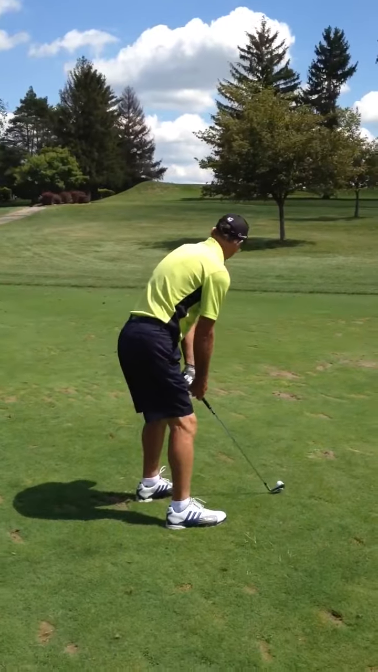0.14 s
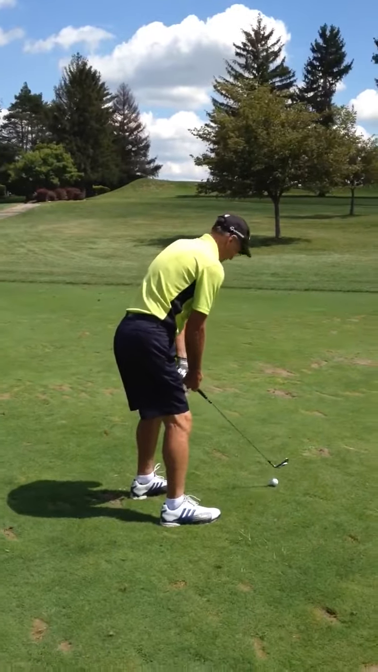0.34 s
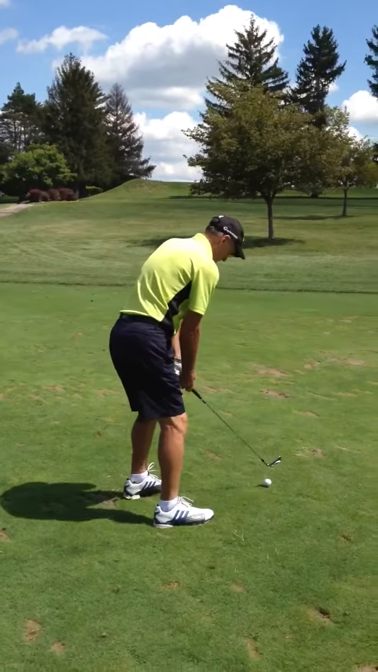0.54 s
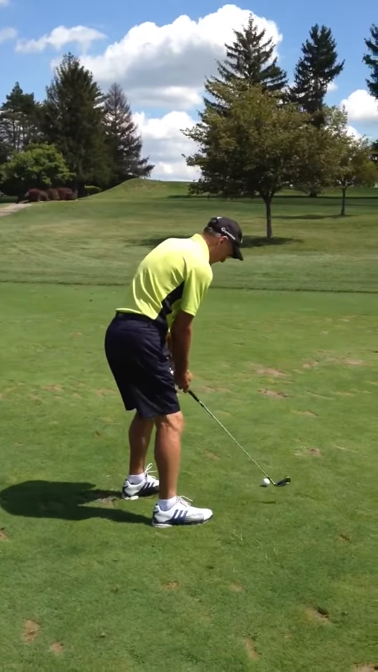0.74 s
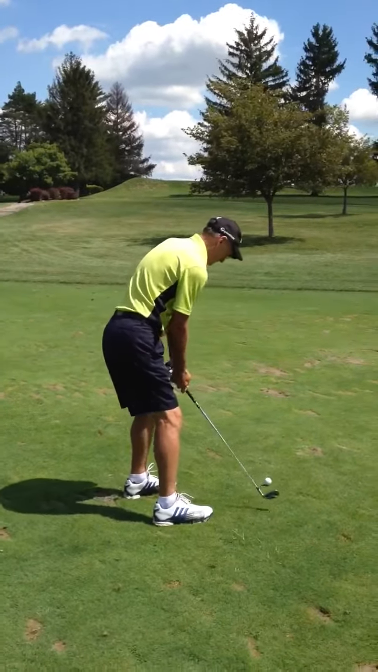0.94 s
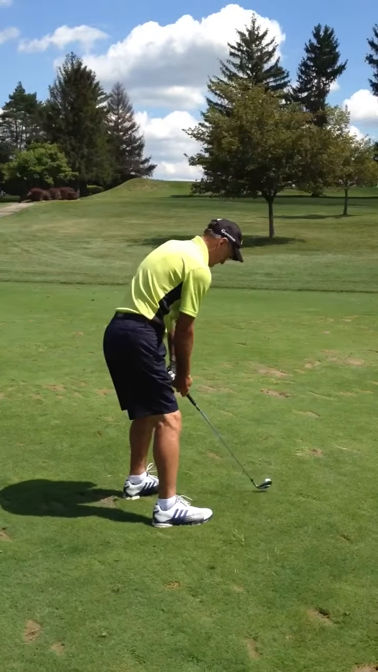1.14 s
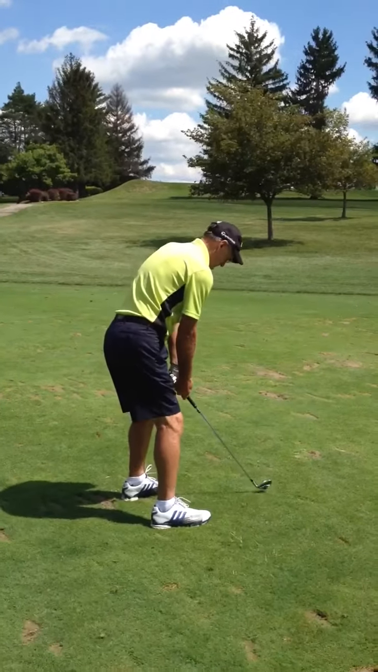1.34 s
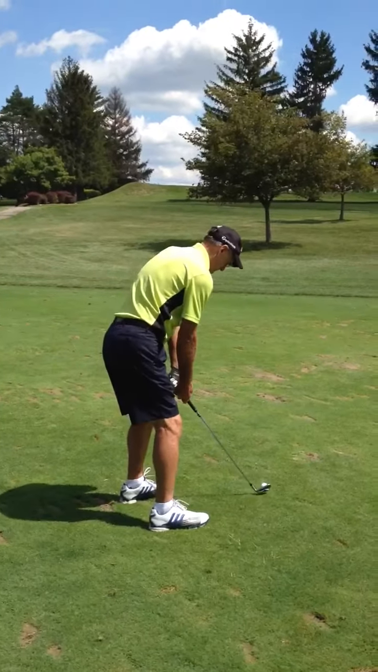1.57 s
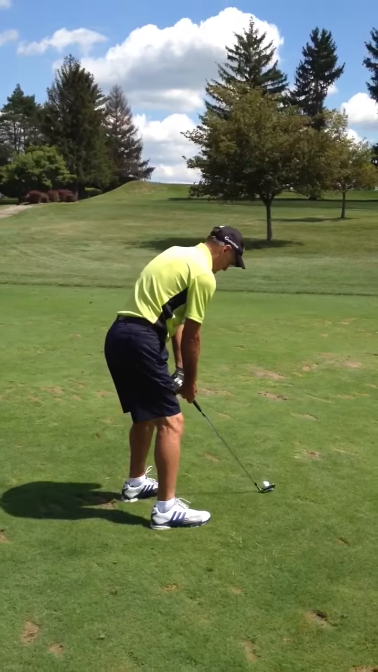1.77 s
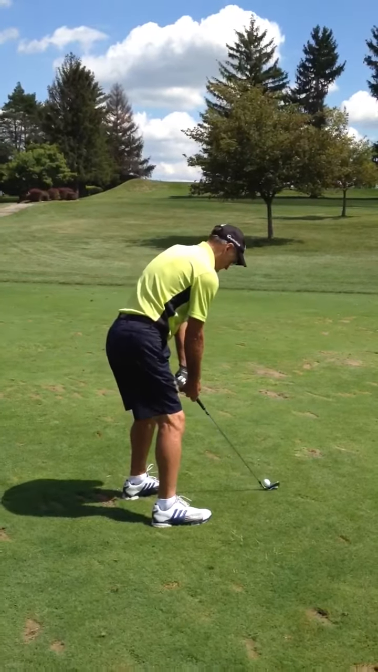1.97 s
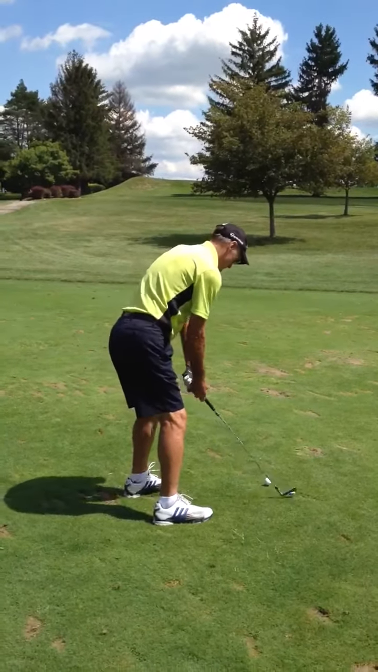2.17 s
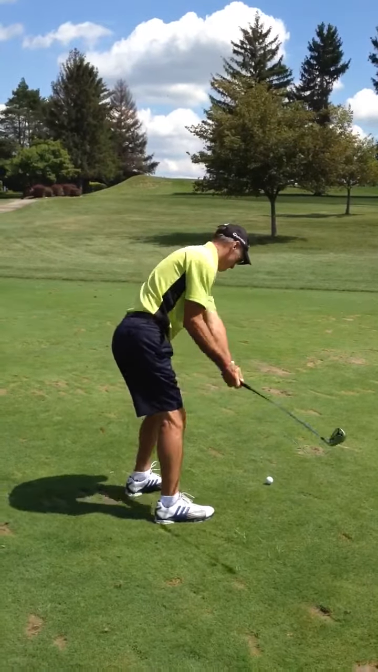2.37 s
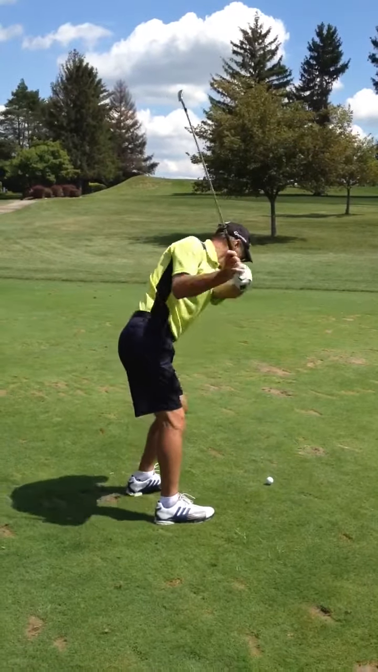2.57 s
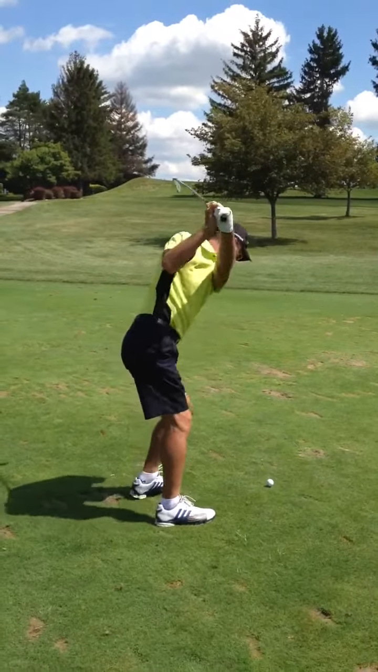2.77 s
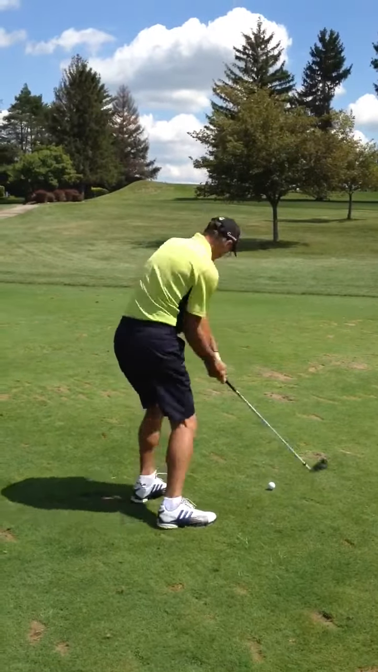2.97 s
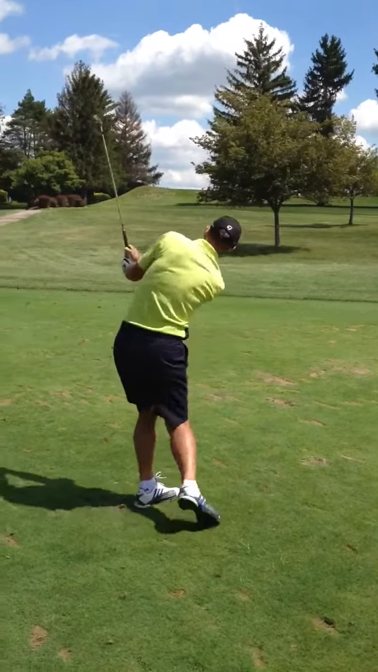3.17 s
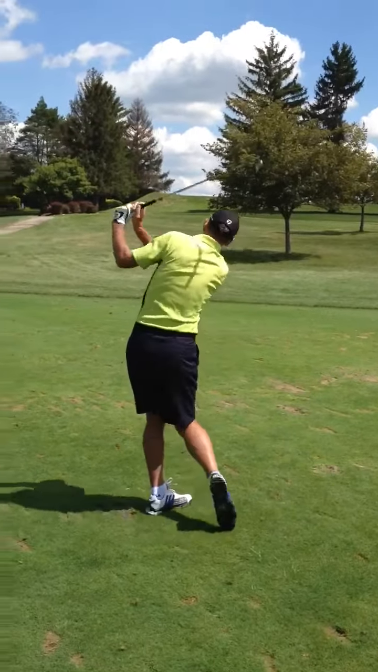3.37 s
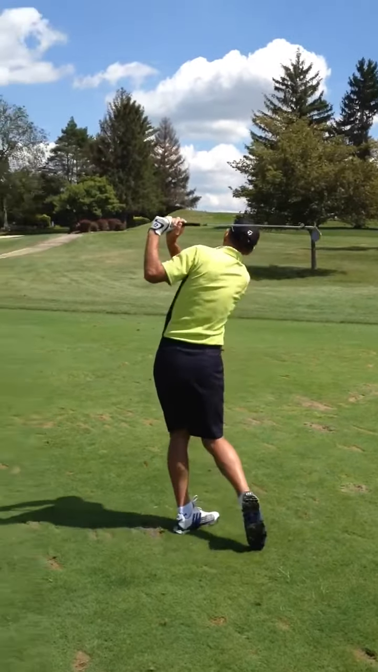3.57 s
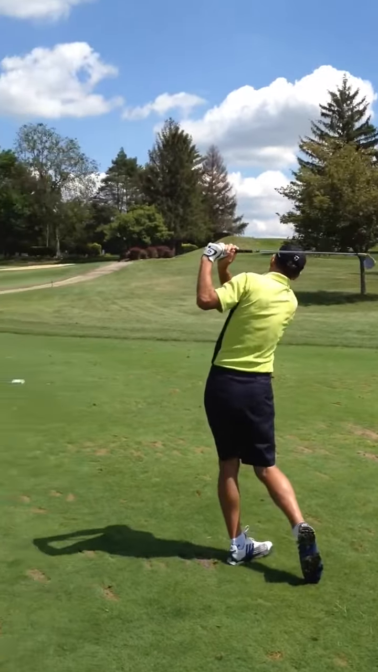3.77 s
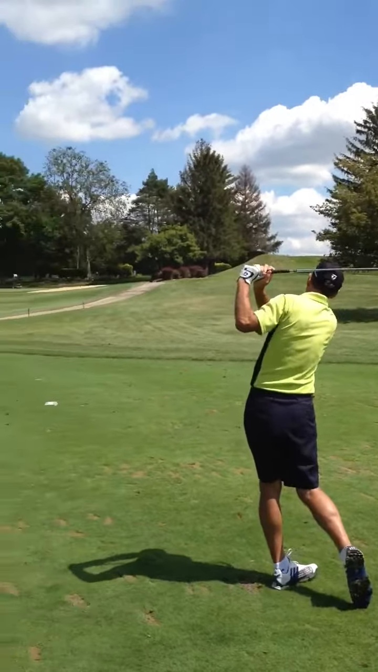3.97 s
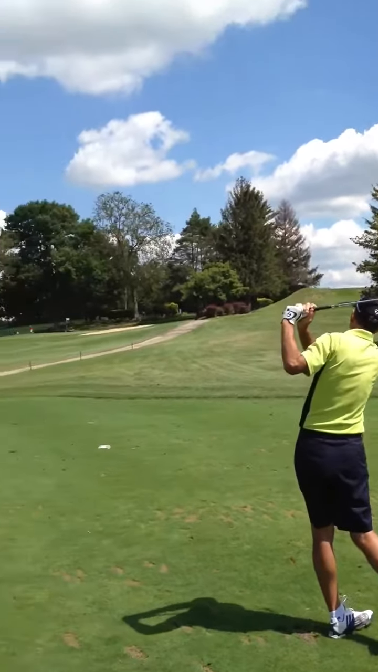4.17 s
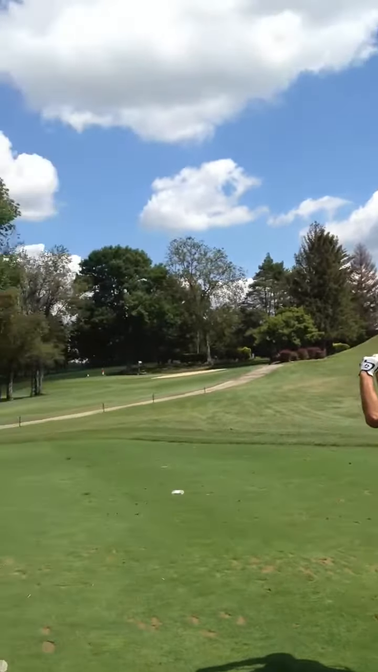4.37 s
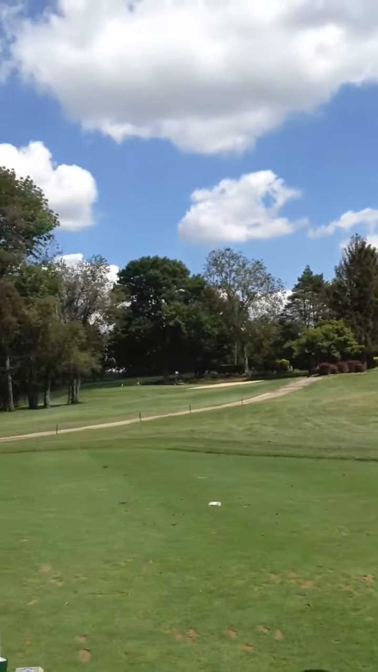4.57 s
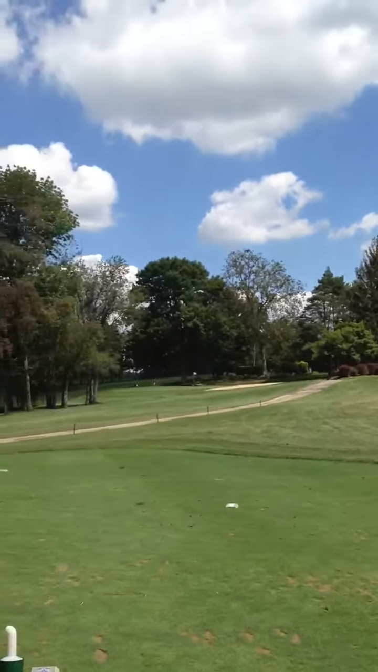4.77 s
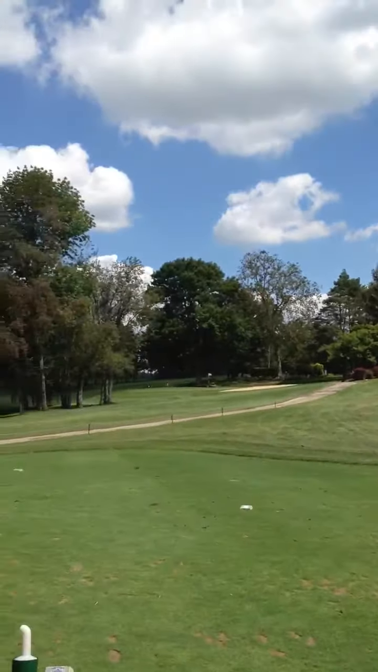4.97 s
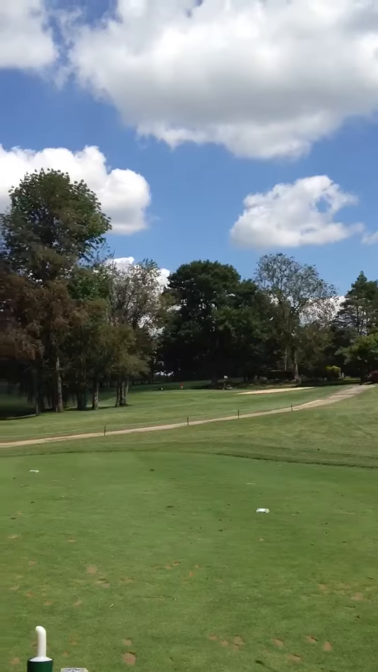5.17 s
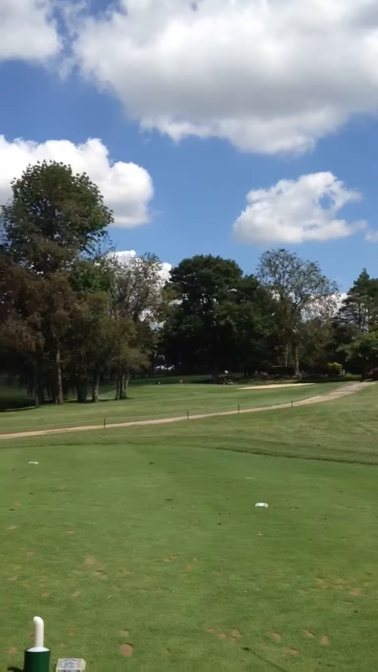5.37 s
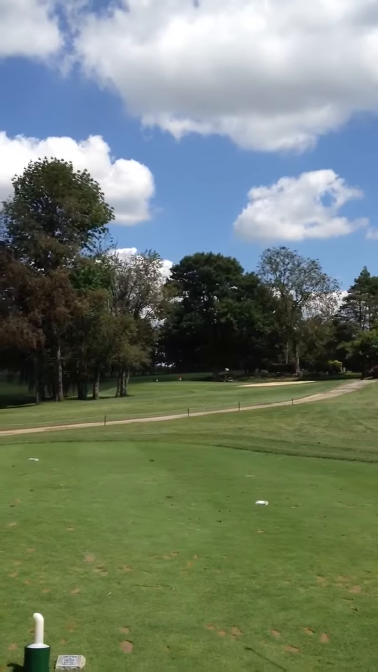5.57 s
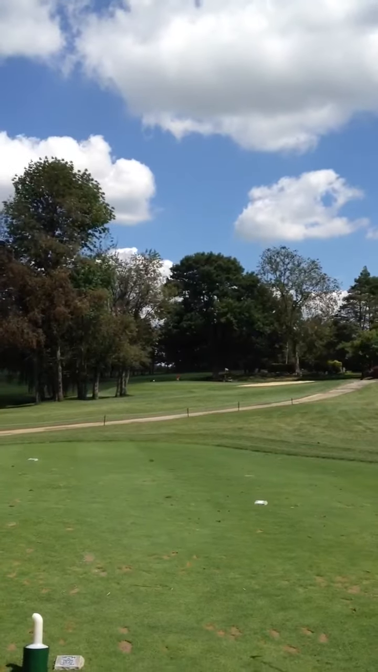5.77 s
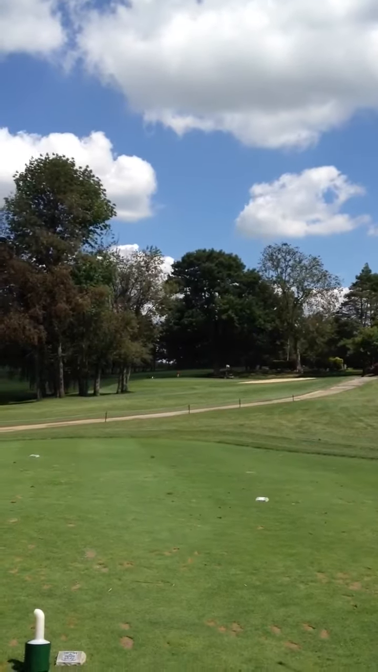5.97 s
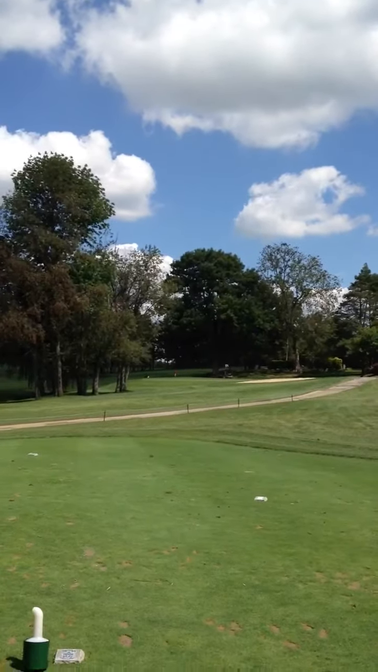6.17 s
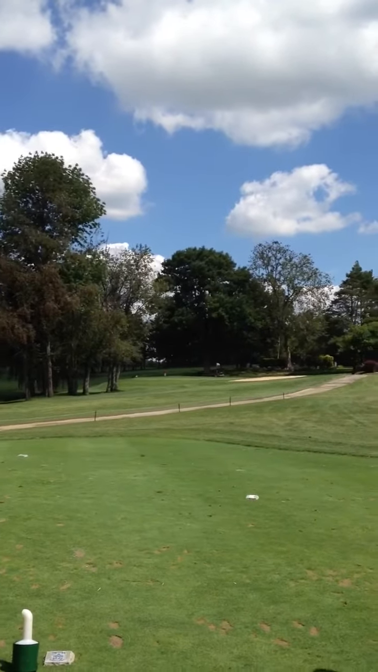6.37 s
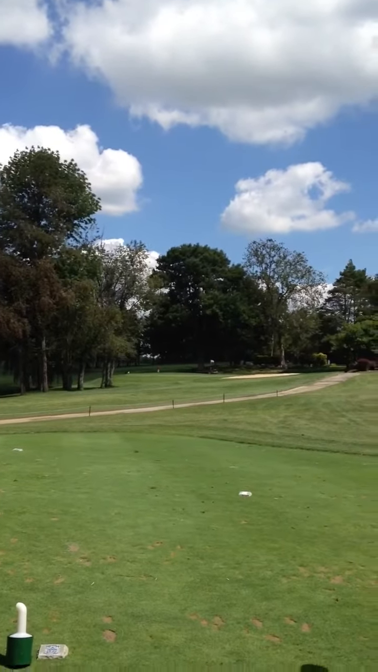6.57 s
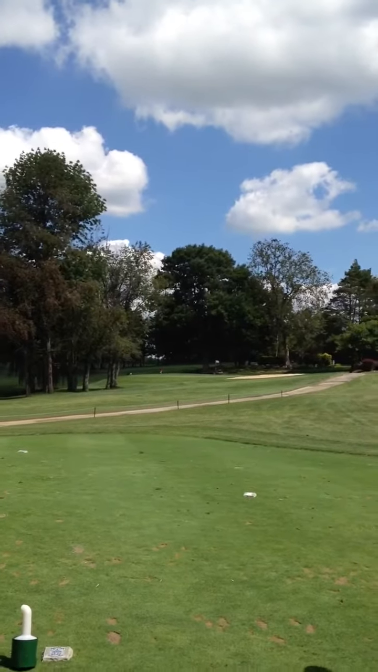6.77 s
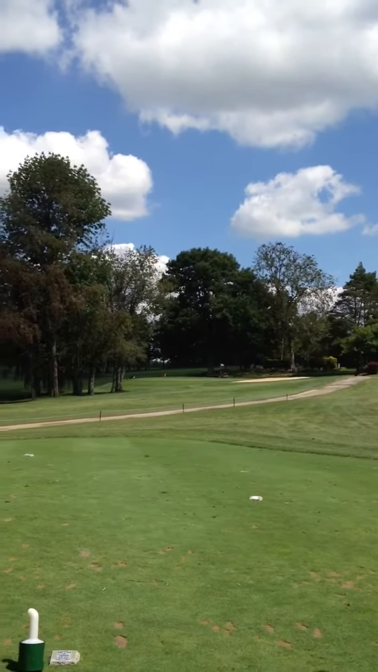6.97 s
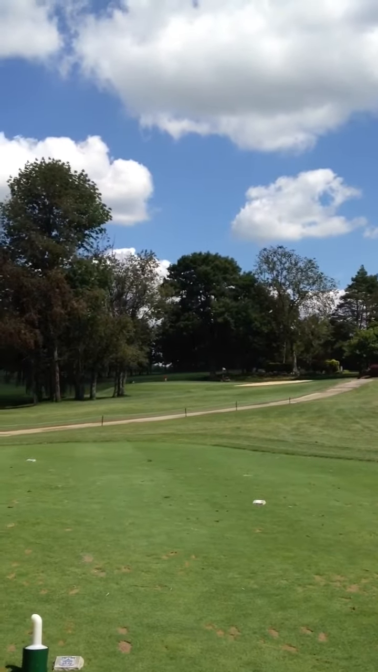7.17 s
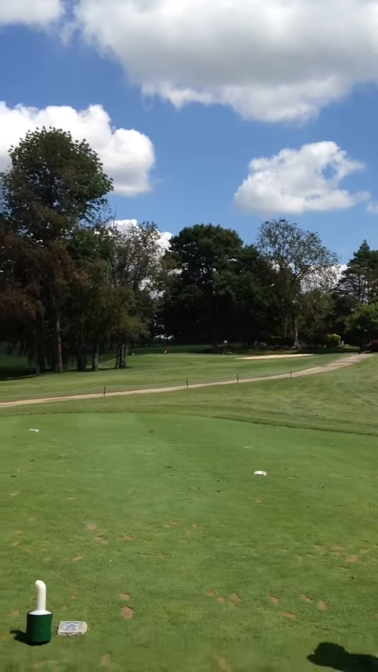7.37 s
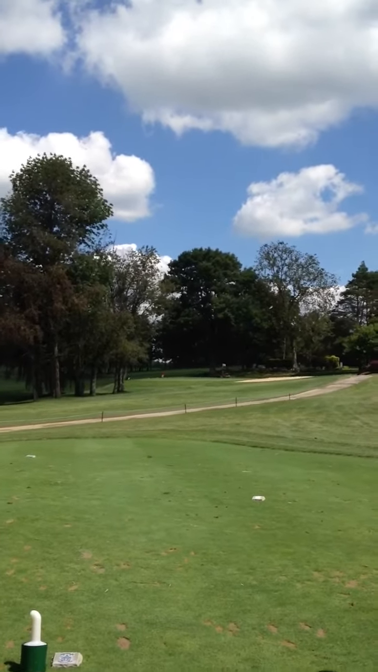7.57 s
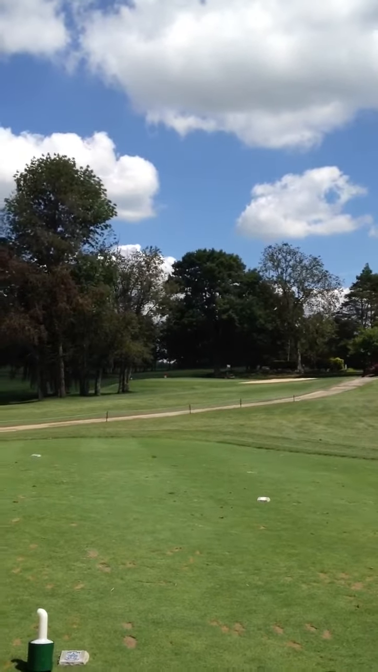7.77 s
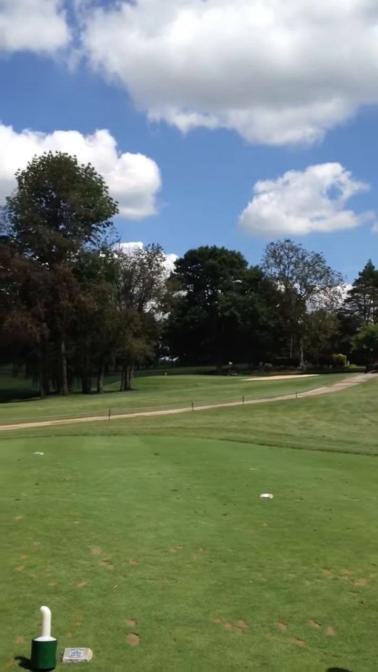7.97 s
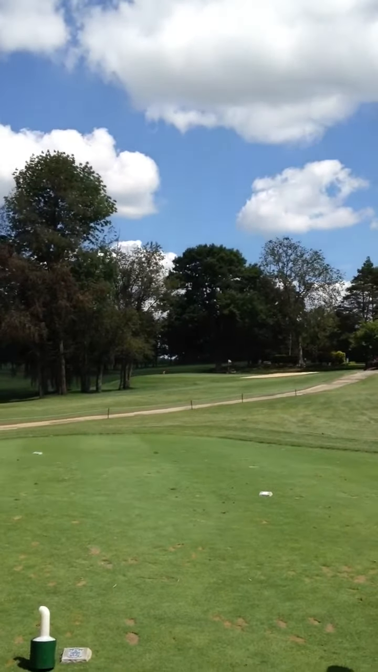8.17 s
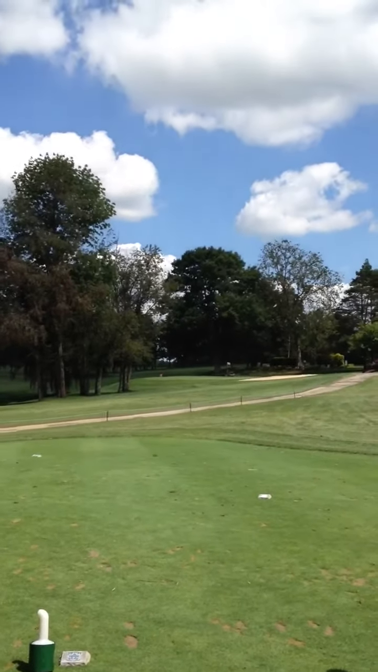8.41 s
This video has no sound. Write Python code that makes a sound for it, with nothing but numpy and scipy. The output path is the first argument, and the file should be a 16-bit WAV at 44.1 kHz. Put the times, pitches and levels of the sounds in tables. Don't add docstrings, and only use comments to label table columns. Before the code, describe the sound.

Thin, treble-rich insect buzzing swells and stops abruptly, preceded at times by groups of four quick ticks. Far traffic and a low motor hum drift underneath. A club suddenly strikes a golf ball close by: a dry, explosive click far louder than everything else, followed by a faint leafy reflection. The insects carry on, with a dull handling knock afterwards, heard through a small camera microphone in open air.

```python
import sys
import numpy as np
from scipy import signal
from scipy.fft import rfft, irfft
from scipy.io import wavfile
from scipy.ndimage import uniform_filter1d

SR = 44100
rng = np.random.default_rng(int(sys.argv[2]) if len(sys.argv) > 2 else 0)


def attenuation_scalar(level_db):
    decades = np.asarray(level_db, float) / 20
    return 10 ** decades


def pcm_store(signal):
    levels = np.round(np.clip(np.atleast_2d(signal), -1, 1) * 32767)
    wavfile.write(sys.argv[1], SR, levels.astype(np.int16).T)


N = 372204
T = np.arange(N) / SR
SWING_S, STRIKE_S = 2.93, 3.0338


def evened(x):
    return x / np.sqrt(np.mean(x ** 2) + 1e-20)


def read(points, hz):
    f, value = np.transpose(points)
    return np.interp(np.log(hz + 1), np.log(f + 1), value)


def follow(rows, t=T):
    s, *columns = np.transpose(rows)
    return [np.interp(t, s, c) for c in columns]


def add(mix, s, sound):
    part = mix[round(s * SR):][:len(sound)]
    part += sound[:len(part)]


def colour(x, points):
    gain = attenuation_scalar(read(points, np.fft.rfftfreq(len(x), 1 / SR)))
    return evened(irfft(rfft(x) * gain, len(x)))


def drift(rate_hz):
    return evened(signal.lfilter(*signal.butter(2, rate_hz / (SR / 2)), rng.standard_normal(N)))


def resonate(x, hz, width):
    turn = np.exp(2j * np.pi * np.cumsum(hz * np.ones(len(x))) / SR)
    r = np.exp(-np.pi * width / SR)
    smooth = signal.lfilter([1], np.convolve([1, -r], [1, -r]), x / turn)
    return evened((turn * smooth).real)


def hump(t, centre, rise, fall):
    return np.exp(-((t - centre) / np.where(t < centre, rise, fall)) ** 2)


# delay/ms, f/Hz, level/dB, t60/s
IMPACT_MODES = [(0, 6500, -15, .01), (.3, 7900, -16, .007), (0, 12600, -15, .004), (.6, 11100, -15, .005),
                (.25, 2830, -18.5, .006), (1.62, 1900, -18, .0025), (.2, 14500, -23, .006),
                (.3, 4840, -20, .007),
                (1.95, 1300, -27.5, .03), (1.73, 2460, -33, 0.0078), (1.07, 820, -30, 0.024),
                 (1.8, 340, -42, 0.032), (7, 147, -39.5, 0.043), (5.54, 268, -36, 0.079),
                 (1.4, 4850, -25.5, 0.016), (3.9, 5500, -27.5, 0.017), (3, 6000, -18.5, 0.0058),
                 (2.02, 2500, -31, 0.011), (11, 23000, -37, .012)]
# f/Hz, level/dB per Hz
TURF_SPECTRUM = [(120, -34), (200, 8), (1300, -4), (4100, 7.5), (4750, -14), (5490, -10), (8050, 0),
                 (14400, 1.5), (15500, -46)]


def strike(turf_db=-21, turf_t60=0.041, turf_s=0.012):
    t, out = np.arange(4000) / SR, np.zeros(4000)
    delay_ms, blow_db, long_ms = .28, -9, .82
    start_hz, end_hz = 5000, 150
    u = np.arange(0, 1, 1000 / long_ms / SR)
    blow_hz = start_hz + (end_hz - start_hz) * u ** 0.291
    blow = -attenuation_scalar(blow_db) * np.sqrt(1 - u ** 2) * np.sin(2 * np.pi * np.cumsum(blow_hz) / SR)
    add(out, delay_ms / 1000, blow)
    for ms, hz, db, t60 in IMPACT_MODES:
        decay = attenuation_scalar(db - 60 * t / t60) * np.minimum(t / 0.00022, 1)
        add(out, ms / 1000, -decay * np.sin(2 * np.pi * hz * t))
    grit = rng.standard_normal(len(t)) * attenuation_scalar(1.5 * np.minimum(rng.exponential(1, len(t)), 3))
    tearing = np.clip((t - .0008) / 0.0003, 0, 1) * np.clip((turf_s - t) / 0.0065 + 1, .2, 1)
    out = out + attenuation_scalar(turf_db - 60 * t / turf_t60) * tearing * colour(grit, TURF_SPECTRUM)
    return signal.sosfilt(signal.butter(4, 120 / (SR / 2), "high", output="sos"), out)


# t/s at centre, rise/s, fall/s, f/Hz, level/dB
SHAFT_TONES = [
    (3.002, .011, .006, 615, -40),
    (3.0275, .006, .006, 585, -37),
]


def swing(fuzz=0.39):
    t = np.arange(SWING_S, STRIKE_S, 1 / SR)
    whistle = np.zeros(len(t))
    for s, rise, fall, hz, db in SHAFT_TONES:
        clear = np.sqrt(2) * np.sin(2 * np.pi * hz * (t - s))
        fuzzy = fuzz * resonate(rng.standard_normal(len(t)), hz, 150)
        whistle += attenuation_scalar(db) * hump(t, s, rise, fall) * (clear + fuzzy)
    rush = colour(rng.standard_normal(len(t)), [(100, -45), (300, -12), (700, 1), (1300, -8),
                                                (2500, -17.0), (4500, -16), (9000, -34), (15000, -80)])
    level = attenuation_scalar(-45) * hump(t, 2.995, rise=.017, fall=.016)
    return (whistle + level * rush) * signal.windows.tukey(len(t), .03)


# t/s, level/dB, rise/s, t60/s
ECHOES = [
    (3.047, -40.5, 0.0014, 0.1),
    (3.085, -41.5, 0.0037, 0.086),
    (3.098, -45, 0.013, 0.18),
    (3.135, -50, 0.013, 0.18),
    (3.17, -57, .03, 0.64),
]
# f/Hz, level/dB per Hz
ECHO_SPECTRUM = [(150, -15), (600, 1), (3000, -3.5), (6300, -5.5), (9000, -5), (15300, -25), (15400, -90)]


def echoes(mix):
    t = np.arange(12000) / SR
    for s, db, rise, t60 in ECHOES:
        leaves = rng.standard_normal(len(t)) * attenuation_scalar(2 * np.minimum(rng.exponential(1, len(t)), 3))
        envelope = attenuation_scalar(db - 60 * t / t60) * np.minimum(t / rise, 1)
        add(mix, s, envelope * colour(leaves, ECHO_SPECTRUM))


# t/s, peak level/dB, f/Hz, turns of pressure
BUMPS = [
    (5.35, -35, 162, 2),
    (5.3625, -38, 215, 1.5),
    (6.04, -57, 110, 2.2),
    (7.135, -49, 106, 2),
]


def bumps(mix):
    high_pass = signal.butter(2, 75 / (SR / 2), "high", output="sos")
    for s, db, hz, turns in BUMPS:
        u = np.arange(0, 1, hz / turns / SR)
        push = attenuation_scalar(db) * np.sin(np.pi * u ** 0.53) ** 2 * np.sin(2 * np.pi * turns * (u - .45))
        add(mix, s, signal.sosfilt(high_pass, np.pad(push, (0, 1500))))


# start t/s, end t/s, full level/dB
BUZZES = [
    [(-.3, .56, -54.5), (1.53, 2.27, -54.5), (3.4, 4.15, -53), (5.1, 5.7, -52), (6.82, 7.45, -53)],
    [(.66, 1.37, -56), (2.46, 3.17, -55), (3.9, 4.655, -55), (5.55, 6.34, -54.5), (7.2, 8.0, -54)],
    [(-.2, .75, -67), (1.3, 1.62, -60.5), (2.2, 2.55, -67), (3.0, 3.6, -60.5), (4.4, 5.12, -60),
     (6.1, 7.0, -61.5), (7.6, 8.07, -65)],
]
# depth below full/dB, swell/s
BUZZ_SWELL = [(6, 0.28), (6.5, 0.32), (1, .3)]
# t/s, peak level/dB
TICKS = [
    [(1.3842, -44), (1.4367, -39), (1.485, -41), (1.5293, -43), (3.2121, -43), (3.266, -39), (3.3169, -41),
     (3.3672, -40), (4.8125, -39), (4.8763, -42), (4.9307, -41), (4.9871, -44), (6.6174, -38.5),
     (6.6732, -38), (6.7221, -38), (6.7735, -39), (8.2671, -38), (8.3275, -40.5), (8.3774, -41),
     (8.4314, -40)],
    [(0.624, -44), (2.3226, -43.5), (2.3786, -42), (2.4309, -43)],
    [],
]
# f/Hz, level/dB per Hz
WINGS = [
    [(5650, -39), (9600, -17), (11000, -7.5), (11550, -6.5), (11950, 0), (12350, -3.5), (12900, -4),
     (14000, -4.5), (15000, -5), (15300, -4)],
    [(5650, -45), (9600, -10.5), (10700, -7), (11100, -3), (11800, 0), (12400, -0.5), (12750, 2.5),
     (13500, 0), (14050, 4), (14700, -3), (15200, -3), (15300, 3)],
    [(5650, -49), (9600, -18), (11000, -9), (12300, -7), (12650, -5), (13250, 0), (14500, -9), (15000, -4),
     (15300, -10)],
]
STROKES_PER_S = (61.9, 61.3, 57.5)


def katydids(tick_t60=0.054, teeth_per_s=22000, linger_s=0.013):
    closing_share, opening_db, blur = .55, -12, .75
    out, t = np.zeros(N), np.arange(2000) / SR
    for buzzes, (below_db, swell), ticks, wing, per_s in zip(BUZZES, BUZZ_SWELL, TICKS, WINGS, STROKES_PER_S):
        stroke = np.cumsum(per_s * (1 + 0.0049 * drift(2.2))) / SR % 1
        shut = np.sin(np.pi * np.clip(stroke / closing_share, 0, 1))
        opening = np.clip((stroke - closing_share) / (1 - closing_share), 0, 1)
        opened = attenuation_scalar(opening_db) * np.sin(np.pi * opening)
        effort = np.zeros(N)
        for start, end, db in buzzes:
            swelling = attenuation_scalar(db - below_db * np.clip(1 - (T - start) / swell, 0, 1))
            onset = np.clip((T - start) / 0.065, 0, 1)
            effort += swelling * onset * np.exp(-np.maximum(T - end, 0) / linger_s)
        effort = effort * evened(blur + shut + opened)
        for s, db in ticks:
            add(effort, s - .002, attenuation_scalar(db - 3.5 - 60 * t / tick_t60) * np.minimum(t / 0.003, 1) ** 2)
        teeth = rng.standard_normal(N) * (rng.random(N) < teeth_per_s / SR)
        out += effort * colour(teeth, wing + [(15380, -120)])
    return out


# f/Hz, level/dB per Hz
CHORUS_WINGS = [(3940, -57), (6700, -18), (7100, -3), (7930, 2.5), (8400, -0.5), (9200, -15.5),
                (12000, -71), (20200, -120)]


def chorus(per_s=20000, spread_db=1.5, flicker_db=-0.08):
    sizes = attenuation_scalar(spread_db * rng.exponential(1, N))
    clicks = sizes * rng.standard_normal(N) * (rng.random(N) < per_s / SR)
    crickets = attenuation_scalar(-71) * resonate(rng.standard_normal(N), hz=4520, width=500)
    grown_db = np.interp(T, (3, 4.5), (0, 1.5))
    level = attenuation_scalar(-53.5 + grown_db + flicker_db * drift(20.5))
    return level * colour(clicks, CHORUS_WINGS[:-1] + [(15300, -120)]) + crickets


# t/s, nearness level/dB
NEAR = [(0.0, -3.5), (0.75, -1), (1.2, 2), (1.6, 0.3), (2.05, 2.5), (2.25, 0.5), (2.54, 3.5), (2.85, -0.9),
        (3.6, 0.5), (4.0, .6), (4.3, -1.5), (4.65, 0.6), (5.6, -2), (6.4, -2), (7.9, -3), (8.2, -1.1),
        (8.44, -2.2)]
# t/s at centre, length/s, level/dB
CARRIED = [
    [(1.9, 1.3, -74)],
    [(.25, 0.75, -76), (2.75, 0.54, -68), (4.5, 0.84, -66.5), (5.37, .1, -58), (6.63, 0.26, -62.5),
     (7.38, 0.56, -59), (8.35, .3, -76)],
    [(.7, 0.29, -57.5), (1.95, 0.54, -61.5), (2.5, 0.21, -54.5), (3.09, 0.1, -59), (4.85, .3, -71.5),
     (5.9, 0.27, -66), (6.55, 0.4, -63.5), (7.2, 0.5, -64.5), (8.25, 0.57, -70)],
    [(1.1, 0.48, -68), (2.08, 0.17, -60.5), (2.5, 0.22, -64), (2.83, 0.083, -58), (3.22, .25, -64.5),
     (3.92, 0.4, -63.5), (6.35, .3, -69)],
]
# t/s at centre, length/s, f/Hz, level/dB
WHINE = [
    (2.07, 0.2, 897, -58.5),
    (2.197, 0.15, 919, -55.5),
]


def motor(waver=0.0063, flutter_db=3.5):
    firing_hz, sag_hz_per_s = 79.94, -.55
    still_air_db = (-88.5, -79.5, -79, -72)
    turns = np.cumsum((firing_hz + sag_hz_per_s * T) * (1 + waver * drift(2.4))) / SR
    out = np.zeros(N)
    for k, (still_db, gusts) in enumerate(zip(still_air_db, CARRIED)):
        level = attenuation_scalar(still_db + 0.65 * follow(NEAR)[0])
        for s, long, db in gusts:
            level += attenuation_scalar(db) * hump(T, s, long / 2, long / 2)
        tone = np.sin(2 * np.pi * ((k + 1) * turns + rng.random()))
        out += level * attenuation_scalar(flutter_db * drift(7.0)) * tone
    for s, long, hz, db in WHINE:
        level = attenuation_scalar(db + 3.2 * drift(30.0)) * hump(T, s, long / 2, long / 2)
        out += level * np.sin(2 * np.pi * hz * T)
    return np.sqrt(2) * out


# t/s at centre, length/s, level/dB
TYRES = [
    (1.196, 0.35, -59.5),
    (1.95, .4, -64),
    (2.4, 0.56, -60),
    (2.9, .2, -60),
]


def tyres():
    level = sum(attenuation_scalar(db) * hump(T, s, long / 2, long / 2) for s, long, db in TYRES)
    return level * resonate(rng.standard_normal(N), hz=608, width=150)


# f/Hz, level/dB per Hz
AIR = [(24, -74), (40, -37), (85, -36), (99, -13), (145, -8), (228, -2), (315, -8), (444, -12), (562, -10),
       (1480, -17.5), (4420, -20), (5730, -23), (6800, -10.5), (8840, -56), (15000, -120)]
# f/Hz, level/dB per Hz
AIR_TOP = [(6800, -24.5), (9000, -17), (9400, -57), (10200, -29), (15300, -28), (15400, -120)]


def air(patchy_db=0.83):
    frames, hz = N // 256 + 5, np.fft.rfftfreq(1024, 1 / SR)
    a, b, patches = rng.standard_normal((frames, 513, 3)).T
    patches = uniform_filter1d(patches, size=10, axis=0)
    patches = evened(uniform_filter1d(patches, size=14, axis=1))
    t = np.arange(-2, frames - 2) * 256 / SR
    near_db = follow(NEAR, t)[0]
    rumble_db = 1.5 * near_db
    roar_db = 0.74 * near_db - .3 * t
    low = read([(130, 0.16), (220, 0.27), (340, 1), (420, 0.03)], hz)
    middle = read([(420, 0.081), (520, 0.43), (740, 1), (1100, 0.32), (2000, 0.16)], hz)
    swell_db = np.outer(low, rumble_db - rumble_db.mean()) + np.outer(middle, roar_db - roar_db.mean())
    spectrum_db = read(AIR[:-3] + AIR_TOP, hz)[:, None]
    z = (a + 1j * b) * attenuation_scalar(spectrum_db + swell_db + patchy_db * patches)
    noise = signal.istft(z, nperseg=1024, noverlap=768, boundary=False)[1]
    return attenuation_scalar(-53.5) * evened(noise[512:][:N])


def scene():
    mix = air() + motor() + chorus() + katydids() + tyres()
    add(mix, SWING_S, swing())
    add(mix, STRIKE_S, strike())
    echoes(mix)
    bumps(mix)
    return np.array([mix, mix])


def low_pass(x):
    return signal.sosfilt(signal.butter(12, 16290, fs=SR, output="sos"), x)


# from f/Hz, to f/Hz, share of time lost, masking by the buzz (0-1)
STARVED = [(9090, 9280, .5, 0), (9280, 9640, .88, 0), (9640, 9990, .16, .4), (9990, 10330, .09, .4),
           (14470, 14810, .05, 1), (14810, 15160, .1, 1), (15160, 15400, .03, 1)]


def record(dry):
    hz, _, z = signal.stft(dry[0], SR, nperseg=1024, noverlap=768)
    buzz = (abs(z[(hz > 11500) & (hz < 14400)]) ** 2).mean(0) + 1e-14
    for low_hz, high_hz, share, masking in STARVED:
        band = (hz > low_hz) & (hz < high_hz)
        power = (abs(z[band]) ** 2).mean(0) / buzz ** masking
        power = uniform_filter1d(power * attenuation_scalar(7.0 * rng.standard_normal(len(power))), size=8)
        z[band] *= power > np.quantile(power, share)
    z[hz > 15400] *= attenuation_scalar(-.045 * (hz[hz > 15400, None] - 15400))
    heard = signal.istft(z, SR, nperseg=1024, noverlap=768)[1][:N]
    return low_pass(np.array([heard, heard]))


dry = scene()
out = record(dry)
pcm_store(out)
```